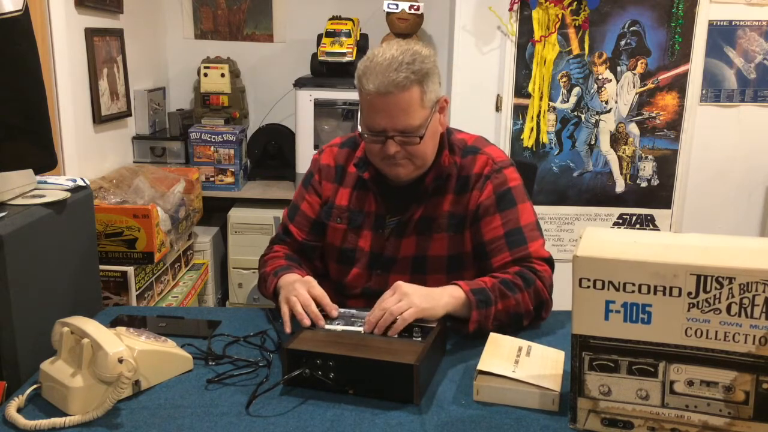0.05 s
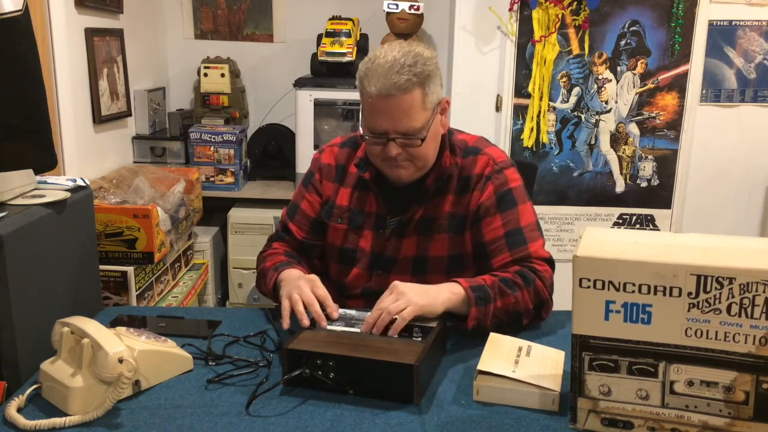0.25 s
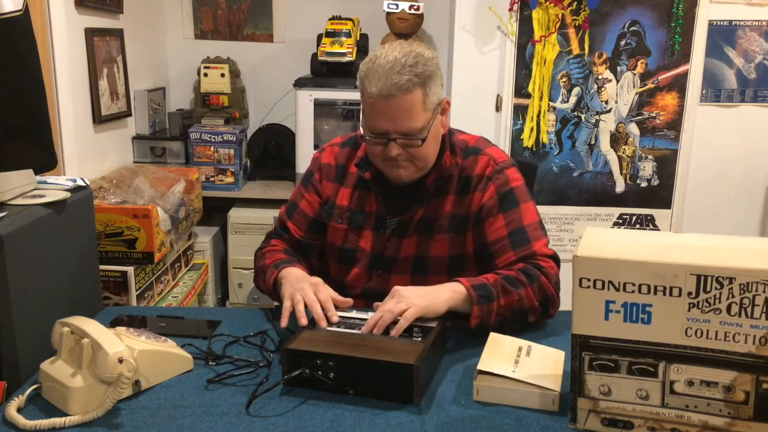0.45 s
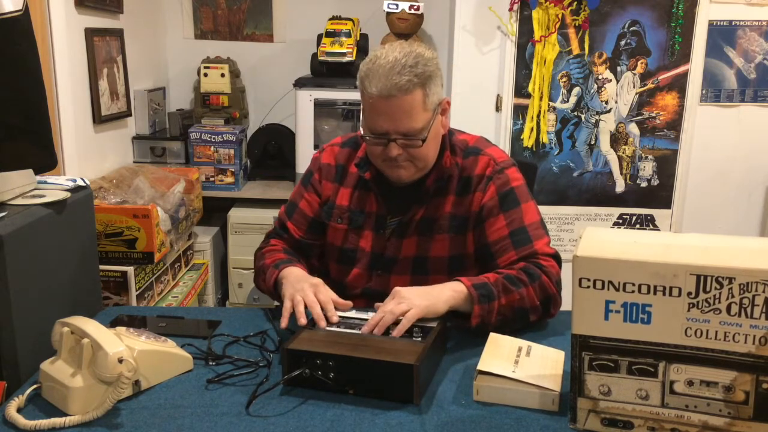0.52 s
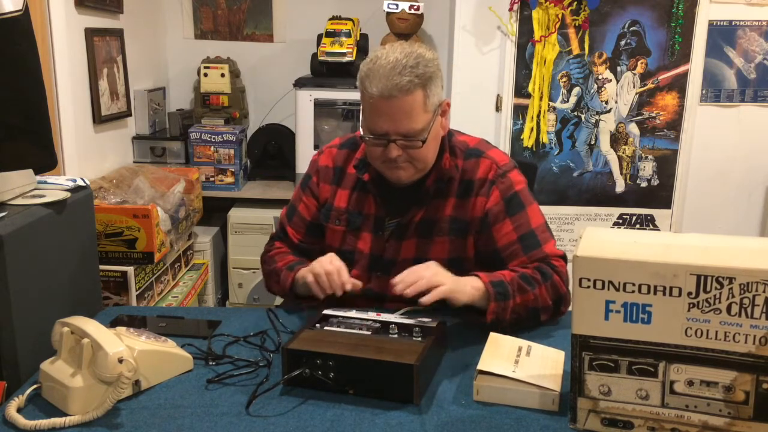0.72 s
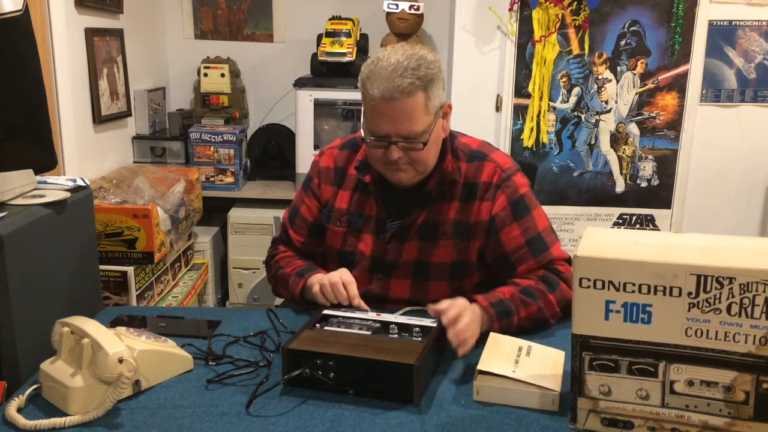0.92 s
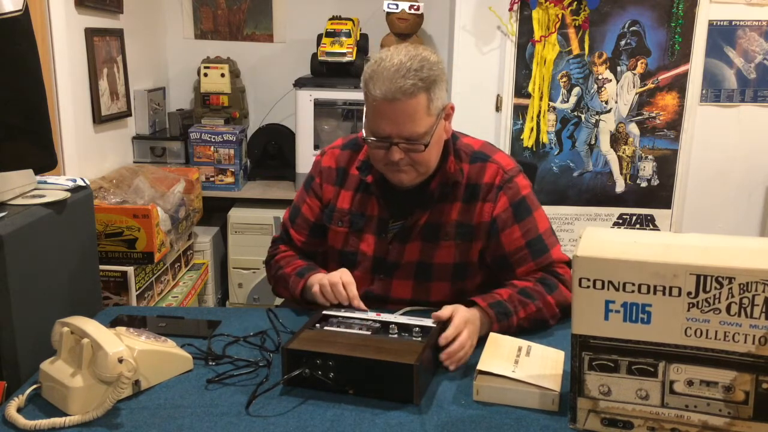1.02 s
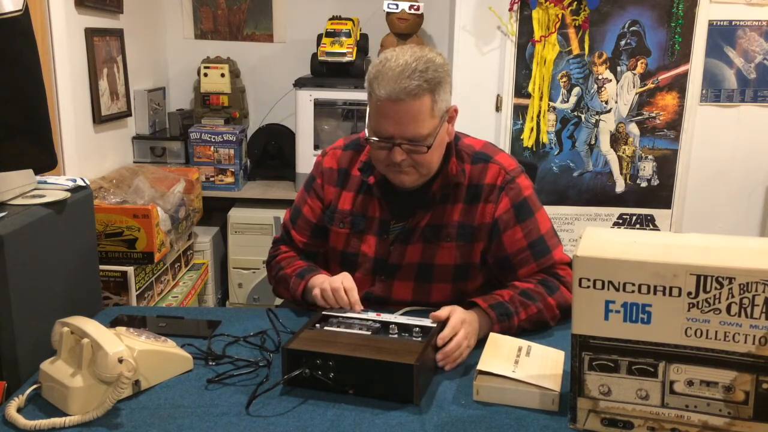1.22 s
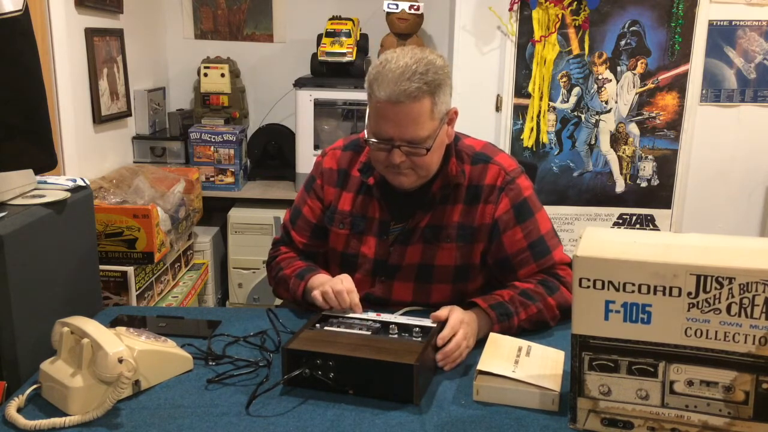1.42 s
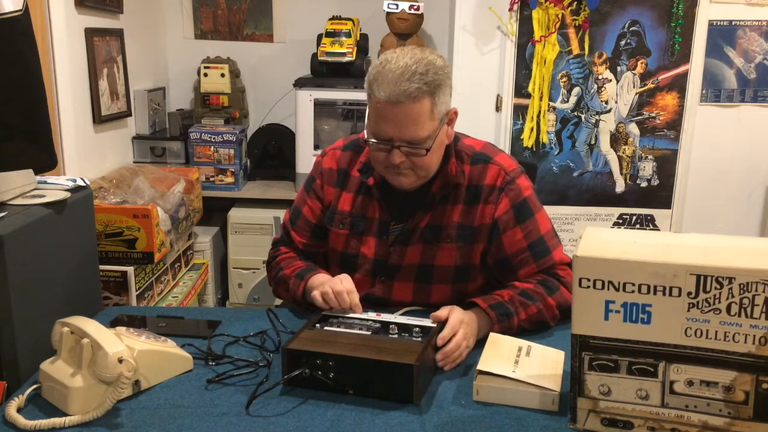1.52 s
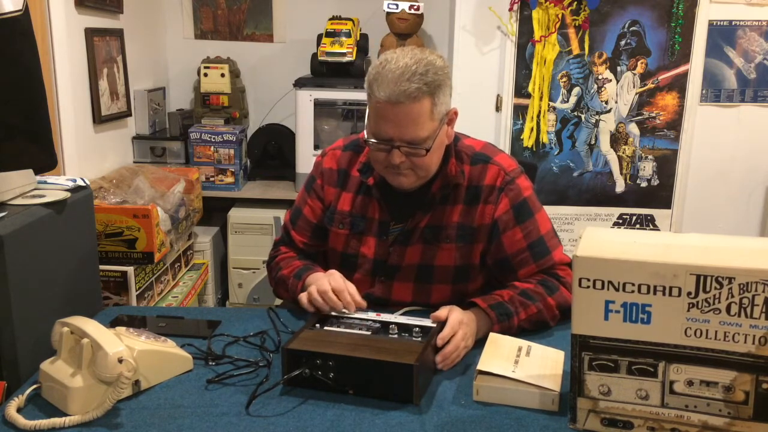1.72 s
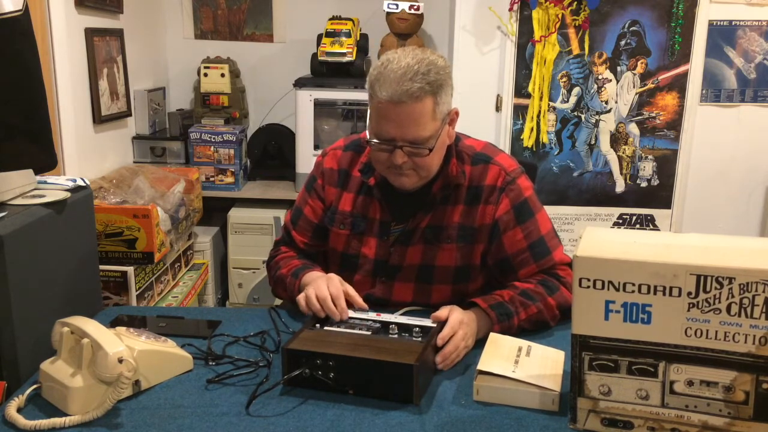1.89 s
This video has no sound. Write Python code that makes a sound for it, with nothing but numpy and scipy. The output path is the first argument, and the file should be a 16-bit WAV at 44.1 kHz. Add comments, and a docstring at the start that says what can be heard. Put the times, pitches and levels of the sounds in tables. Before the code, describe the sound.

Plastic clacks of a cassette pushed into a tape recorder: after a faint touch at 0 seconds, hard double clicks at about 0.22, 0.41 and 0.455, the last ending in a bright latch snap and a very faint spring hum. A soft tap falls near 0.5. From 1.05 to 1.8, faint grainy key ticks, with a tiny falling squeak near 1.77. Small furnished room, short reflections, low hum and hiss.

```python
"""Mains hum and hiss with a faint touch on the keys, then a tiny squeak, in a small furnished room.
A cassette is pressed into a table-top tape recorder: three plastic clacks, each a first touch and then a snap.
Bursts of noise and decaying sines make the plastic, case, shell and latch; two slow sines hum on as a spring.
Then fingers tick (grainy, softened contacts) and squeak (gliding tones) faintly on the keys."""
import sys
import numpy as np
from scipy import signal
from scipy.fft import rfft, irfft, next_fast_len
from scipy.io import wavfile
from scipy.ndimage import uniform_filter1d

SR = 44100
rng = np.random.default_rng(int(sys.argv[2]) if len(sys.argv) > 2 else 0)


def master(y):
    """Save y as 16-bit WAV."""
    cut = np.clip(np.atleast_2d(y).T, -1, 1)
    pcm = np.round(cut * 32767)  # scale
    wavfile.write(sys.argv[1], SR, pcm.astype(np.int16))


N = 85995  # samples in the scene

# rumble and hiss spectrum: f/Hz, density level/dB
FLOOR_SPECTRUM = [(20, -25.5), (33, -14.5), (50, -4.5), (90, -1), (150, -0.5), (250, -8), (500, -10.5),
                  (1000, -18.5), (3000, -24), (8000, -27), (14000, -29), (16500, -34.5)]
# steady hum lines: f/Hz, rms level/dB
HUM_LINES = [(59.5, -66), (150.7, -76.5)]
# light touches on keys and lid: t/s, level/dB, bass/dB, low-mid/dB, treble/dB, rise time constant/s
KEY_TAPS = [(.002, -44.5, -4, 3.5, -22, 0.0022), (.322, -86, -17, -10, -34.5, 0.0044),
            (0.515, -41, 11, 3, -16, 0.0033), (1.047, -50, -6, -3, 5, 0.004),
            (1.070, -52, -12, 5.5, 1, 0.0015), (1.087, -49, -36, 8.5, -19, 0.0014),
            (1.103, -50.5, 10, 4.5, -4.5, 0.0053), (1.148, -55.5, -5, 8, -0.5, 0.0066),
            (1.182, -52.5, 2, -16, 5, 0.0052), (1.321, -55.5, -11, -5, -4, 0.0037),
            (1.381, -48.5, 3, 2, 4.5, 0.0046), (1.402, -51, 14, 7, -7, 0.00067),
            (1.578, -62.5, 2, 9.5, -18, 0.0034), (1.687, -50, 6, -2, 0.5, 0.015),
            (1.706, -67, 2.5, -19, 21.5, 0.0053), (1.77, -54, -7, 16, -23, .003),
            (1.801, -48.5, 3, 0, -15.5, 0.00073)]
# fingertip slips: t/s, level/dB, start f/Hz, end f/Hz, length/s
FINGER_SQUEAKS = [(.090, -65, 1350, 1300, .012), (1.765, -49, 1000, 560, .02),
                  (1.763, -67, 9200, 7700, .012)]
# hard contacts: t/s, level/dB, bass/dB, low-mid/dB, treble/dB, case ring/dB, shell ring/dB, latch/dB
HARD_CONTACTS = [(.2147, -18, -7.5, -7.5, -12, -3, -4.5, -14.5),
                 (.2256, -19.5, -8, -9, 2, -7.5, -3.5, -8.5), (.2272, -19.5, -6, -4, -7.5, -3.5, 7, -11),
                 (.4067, -20, 2, -7.5, -7, 3.5, -4.5, -9), (.4152, -19.5, -6, 5, 5.5, 0, -1.5, -7.5),
                 (.4242, -21.5, -3, 7, -7.5, -9.5, 0, -15.5), (.4547, -29, -1, 2.5, 0.5, -1, -12, -3.5),
                 (.4577, -18.5, 9, 4, 3.5, -1, -4.5, 3)]
# spectrum of crowded plastic resonances: f/Hz, density level/dB
PLASTIC_SPECTRUM = [(25, -22), (50, -6), (110, -1.5), (270, 0), (400, 5), (650, 3), (1400, 2), (2300, -1.5),
                    (4300, -0.5), (7500, -4.5), (10000, -7), (14500, -10), (16500, -16.5)]
# decay of the plastic: f/Hz, t60/s
PLASTIC_DECAY = [(100, .12), (700, 0.15), (3000, 0.079), (12000, .055)]
# spectrum of the room's answer: f/Hz, density level/dB
ROOM_SPECTRUM = [(25, -19.5), (120, -3.5), (270, -8), (400, 2.5), (600, 4.5), (1400, 6.5), (2500, 3.5),
                 (7000, -0.5), (11000, -9), (16000, -13.5)]
# decay of the room: f/Hz, t60/s
ROOM_DECAY = [(100, .33), (500, .27), (2000, 0.26), (6000, 0.22), (11000, 0.24), (15000, .14)]
# spectrum of the latch snap: f/Hz, density level/dB
SNAP_SPECTRUM = [(500, -26), (2500, -10), (4300, -5.5), (7500, -2.5), (11000, -7.5), (16000, -10.5)]
# ringing modes of the recorder case: f/Hz, level/dB, t60/s
CASE_MODES = [(91, -13, .22), (122, -15, .24), (162, -12, .25), (191, -6.5, .28), (350, -6, .23),
              (395, -5, .22), (445, -6, .18), (565, -8, .17), (632, -6, .17), (675, 1, .18), (700, -3, .13),
              (745, -6, .14), (902, -6, .2), (1010, -6, .15)]
# ringing modes of the cassette shell: f/Hz, level/dB, t60/s
SHELL_MODES = [(1312, -2, .15), (1361, -1, .15), (1443, -4, .16), (1490, -5, .12), (1561, -4, .14),
               (1609, -3, .15), (2090, -9, .14), (3560, -9, .14), (4300, -9, .09)]
# ringing modes of the latch: f/Hz, level/dB, t60/s
LATCH_MODES = [(2650, -8, .18), (3266, -10, .16), (3750, -11, .12), (4200, -6, .07), (4450, -5, .07),
               (5200, -9, .12), (6850, -2, .13), (7070, 0, .14), (7400, -5, .1)]
# the two notes of the spring: f/Hz, level/dB, t60/s
SPRING_MODES = [(398, -60, 1.7), (501, -58.5, 1.9)]

FLOOR_DB = -67
RING_N = SR * 3 // 5  # samples in one contact with its tail
RING_RISE_S = .002  # time constant
CRACK_DB, CRACK_T60_S, BODY_DB = -2, 0.013, -4.5
TABLE_ECHO_S, TABLE_ECHO_DB = 0.004, -3
ROOM_DB, ROOM_RISE_S = -14, 0.0067
BASS_HZ, LOW_MID_HZ, MID_FROM_HZ, MID_TO_HZ = 130, 430, 680, 1500
CLACK_TREBLE_HZ, TAP_TREBLE_HZ = 3200, 7300
SCRAPE_DB = 2  # rms swing of the grain
SQUEAK_WAVER, SQUEAK_OVERTONE_DB = .12, -13  # waver is an rms fraction of the pitch
SQUEAK_ROOM_DB, SQUEAK_T60_S = -1, .17
CASE_DB, SHELL_DB, LATCH_DB = -13.5, -15, -12
SPIKE_DB, SPIKE_HZ, SPIKE_T60_S = 5, 5500, .002
SNAP_DB, SNAP_T60_S = 2.5, .009
TOP_HZ = 16000


def amp(db):
    """Decibels to gain."""
    return 10 ** (np.asarray(db) / 20)


def unit(x):
    """Scale to rms 1."""
    return x / np.sqrt(np.mean(x ** 2) + 1e-20)


def along(points, hz):
    """Read (frequency, value) points on a log frequency axis."""
    f, value = np.transpose(points)
    return np.interp(np.log(hz + 1), np.log(f + 1), value)


def fade(t, t60):
    """Exponential decay, 60 dB down after t60 seconds."""
    return np.exp(-np.log(1000) * t / np.maximum(t60, 1e-4))


def rise(t, time_constant):
    """Soft exponential start."""
    return 1 - np.exp(-t / max(time_constant, 1e-5))


def add(track, s, sound):
    """Mix a sound in at time s, cut off where the track ends."""
    part = track[max(round(s * SR), 0):][:len(sound)]
    part += sound[:len(part)]


def noise(spectrum, size):
    """Random-phase noise of rms 1 with the given spectrum."""
    hz = np.fft.rfftfreq(size, 1 / SR)
    phases = np.exp(2j * np.pi * rng.random(len(hz)))
    return unit(irfft(phases * amp(along(spectrum, hz)), size))


def background():
    """Room rumble and hiss as shaped noise, with steady sines for the hum."""
    t = np.arange(N) / SR
    hum = np.zeros(N)
    for hz, db in HUM_LINES:
        hum += amp(db) * np.sqrt(2) * np.sin(2 * np.pi * (hz * t + rng.random()))
    return amp(FLOOR_DB) * noise(FLOOR_SPECTRUM, N) + hum


def dying(spectrum, t60s):
    """Crowded resonances as noise, each frequency dying at its own speed."""
    hz, t, bins = signal.stft(noise(spectrum, RING_N), SR, nperseg=256)
    decay = fade(t, along(t60s, hz)[:, None])
    return signal.istft(bins * decay, SR, nperseg=256)[1][:RING_N]


def room(t):
    """The short tail of the room: dense reflections that build up softly and die away."""
    return dying(ROOM_SPECTRUM, ROOM_DECAY) * rise(t, ROOM_RISE_S)


def contact(t):
    """Plastic on plastic: a crack, its echo off the table, the rattle of the body and the room."""
    crack = amp(CRACK_DB) * noise(PLASTIC_SPECTRUM, RING_N) * fade(t, CRACK_T60_S)
    body = amp(BODY_DB) * dying(PLASTIC_SPECTRUM, PLASTIC_DECAY)
    out = crack + body + amp(ROOM_DB) * room(t)
    add(out, TABLE_ECHO_S, amp(TABLE_ECHO_DB) * crack)
    return out


def tone(x, bass_db, low_mid_db, treble_db, treble_hz):
    """Causal colour of one contact: where and how hard it lands."""
    size = next_fast_len(2 * RING_N, True)
    points = [(BASS_HZ, bass_db), (LOW_MID_HZ, low_mid_db), (MID_FROM_HZ, 0), (MID_TO_HZ, 0),
              (treble_hz, treble_db)]
    gains = amp(along(points, np.fft.rfftfreq(size, 1 / SR)))
    # folding the cepstrum gives minimum phase, so nothing sounds before the hit
    cepstrum = irfft(np.log(gains), size)
    cepstrum[1:size // 2] *= 2
    cepstrum[size // 2 + 1:] = 0
    return irfft(rfft(x, size) * np.exp(rfft(cepstrum)), size)[:RING_N]


def keys():
    """Fingers nudge the loose keys: soft, faint ticks with an uneven, scraping grain."""
    out, t = np.zeros(N), np.arange(RING_N) / SR
    for s, db, bass_db, low_mid_db, treble_db, rise_s in KEY_TAPS:
        swing = unit(uniform_filter1d(rng.standard_normal(RING_N), size=90))
        grain = unit(amp(SCRAPE_DB * swing))
        touch = contact(t) * rise(t, rise_s) * grain
        add(out, s, amp(db) * tone(touch, bass_db, low_mid_db, treble_db, TAP_TREBLE_HZ))
    return out


def squeaks():
    """A fingertip slips on plastic: a brief, unsteady falling tone with a short ring."""
    out = np.zeros(N)
    for s, db, start_hz, end_hz, length in FINGER_SQUEAKS:
        u = np.arange(int(length * SR)) / (length * SR)  # progress, 0 to 1
        waver = unit(uniform_filter1d(rng.standard_normal(len(u)), size=24))
        glide = end_hz + (start_hz - end_hz) * (1 - u) ** 2
        phase = 2 * np.pi * np.cumsum(glide * (1 + SQUEAK_WAVER * waver)) / SR
        voice = np.sin(phase) + amp(SQUEAK_OVERTONE_DB) * np.sin(2 * phase)
        add(out, s, amp(db) * np.sin(np.pi * u) * voice)
    tail = rng.standard_normal(RING_N) * fade(np.arange(RING_N) / SR, SQUEAK_T60_S)
    tail /= np.linalg.norm(tail)
    return out + amp(SQUEAK_ROOM_DB) * signal.fftconvolve(out, tail)[:N]


def ring(modes, t):
    """Damped modes in alternating polarity, struck a little differently each time."""
    out = np.zeros(len(t))
    for k, (hz, db, t60) in enumerate(modes):
        strength = (-1) ** k * amp(db + rng.standard_normal())
        out += strength * fade(t, t60) * np.sin(2 * np.pi * hz * t)
    return out * rise(t, RING_RISE_S)


def cassette():
    """Each contact rings the case and the cassette shell; the latch adds a sharp snap and a bright ring."""
    out, t = np.zeros(N), np.arange(RING_N) / SR
    spike = amp(SPIKE_DB) * np.sin(2 * np.pi * SPIKE_HZ * t) * fade(t, SPIKE_T60_S)
    for s, db, bass_db, low_mid_db, treble_db, case_db, shell_db, latch_db in HARD_CONTACTS:
        snap = spike + amp(SNAP_DB) * noise(SNAP_SPECTRUM, RING_N) * fade(t, SNAP_T60_S)
        latch = amp(latch_db) * (snap + amp(LATCH_DB) * ring(LATCH_MODES, t))
        case = amp(CASE_DB + case_db) * ring(CASE_MODES, t)
        shell = amp(SHELL_DB + shell_db) * ring(SHELL_MODES, t)
        plastic = tone(contact(t) + case + shell, bass_db, low_mid_db, treble_db, CLACK_TREBLE_HZ)
        add(out, s, amp(db) * (latch + plastic))
    return out


def spring():
    """The last snap leaves a spring in the mechanism humming on two slowly dying notes."""
    out, t = np.zeros(N), np.arange(N) / SR
    last_snap_s = HARD_CONTACTS[-1][0]
    add(out, last_snap_s, ring(SPRING_MODES, t))
    return out


def scene():
    """Everything at one microphone."""
    return (background() + keys() + squeaks() + cassette() + spring())[None]


def record(dry):
    """A steep elliptic low-pass takes away the sound above the band limit."""
    lowpass = signal.ellip(12, .1, 90, TOP_HZ, fs=SR, output="sos")
    return signal.sosfilt(lowpass, dry)


dry = scene()
out = record(dry)
master(out)
```